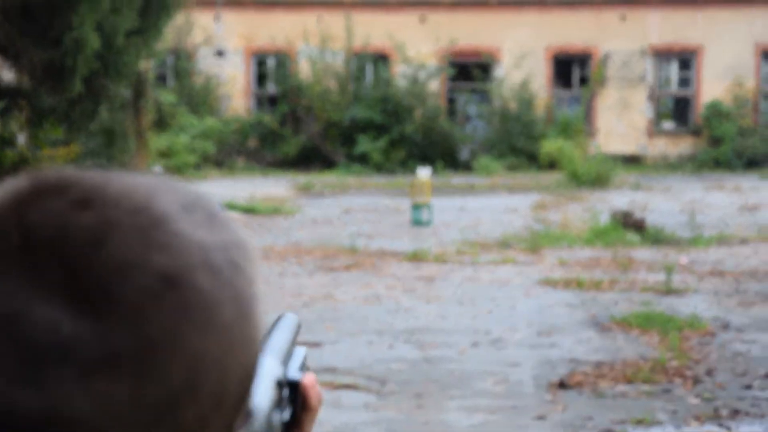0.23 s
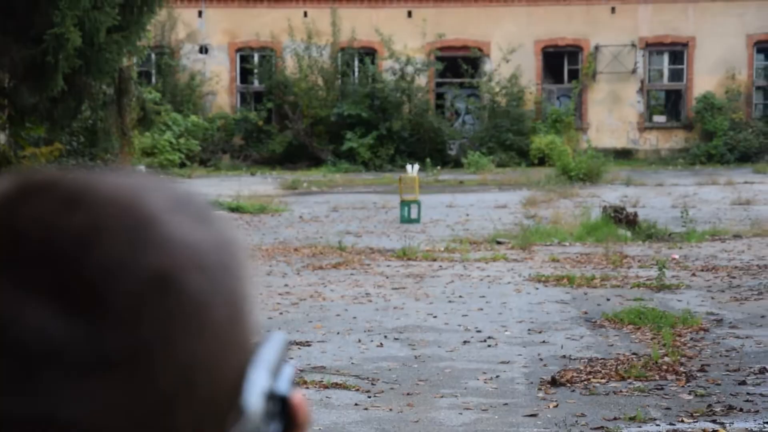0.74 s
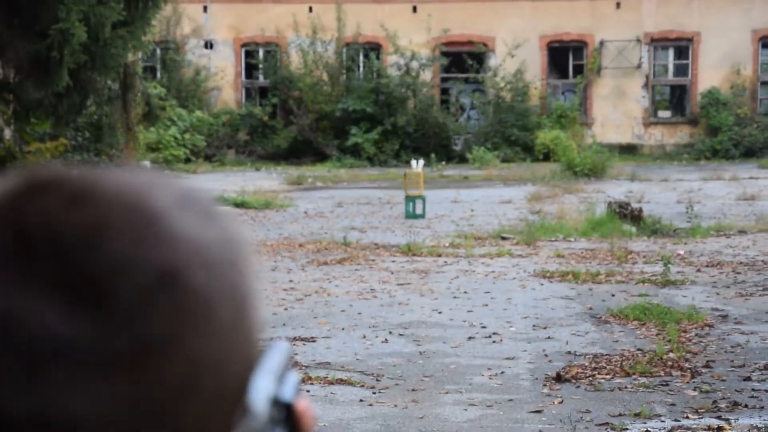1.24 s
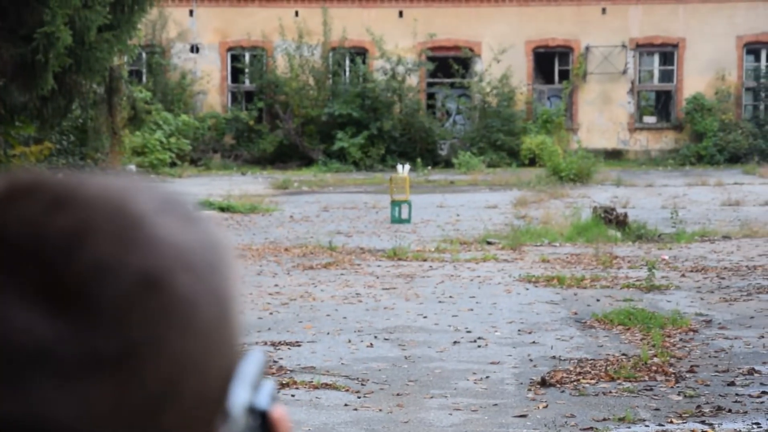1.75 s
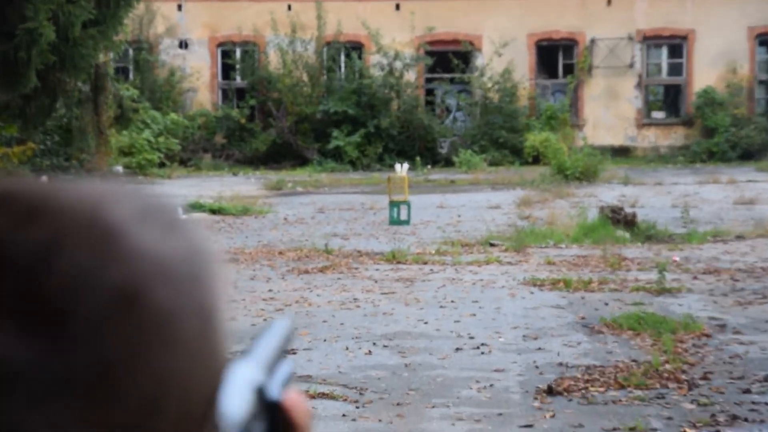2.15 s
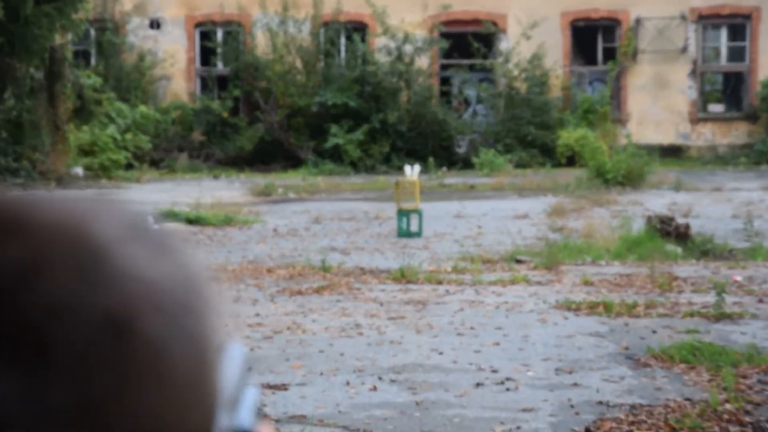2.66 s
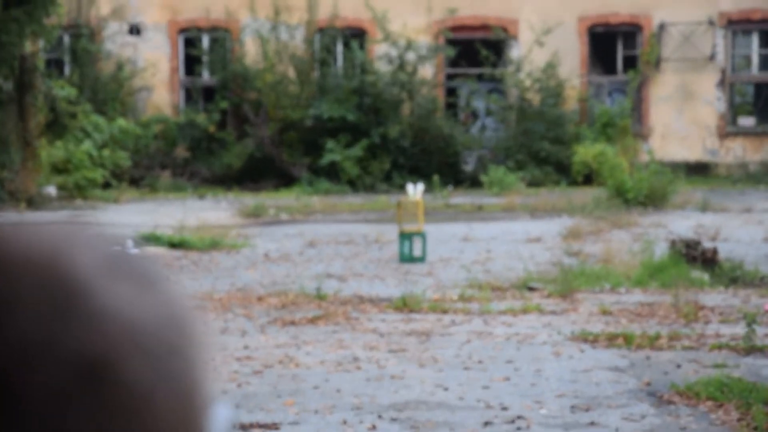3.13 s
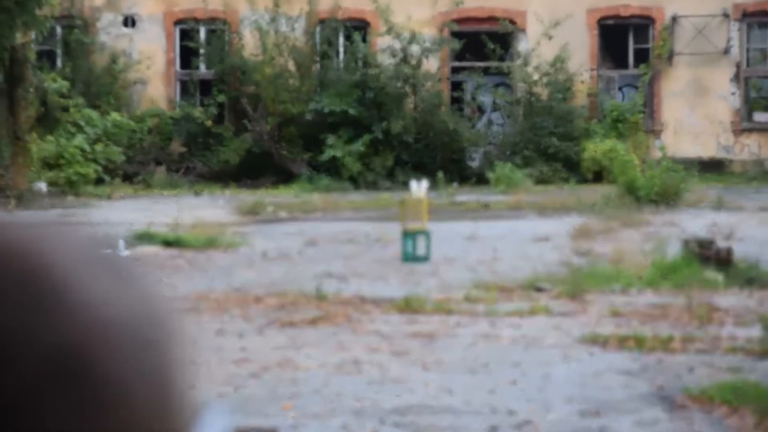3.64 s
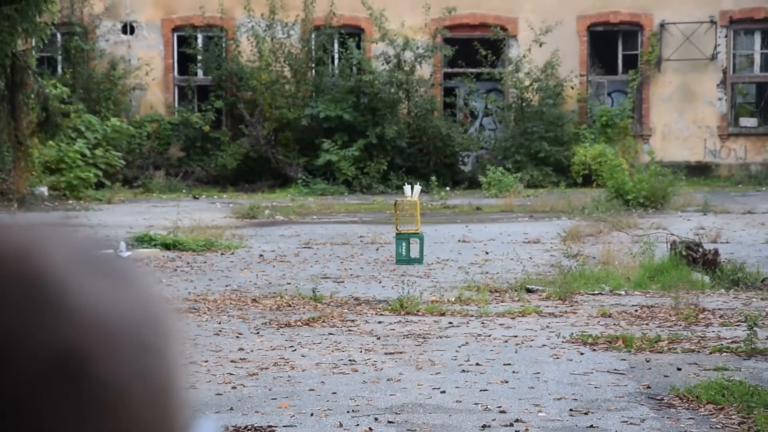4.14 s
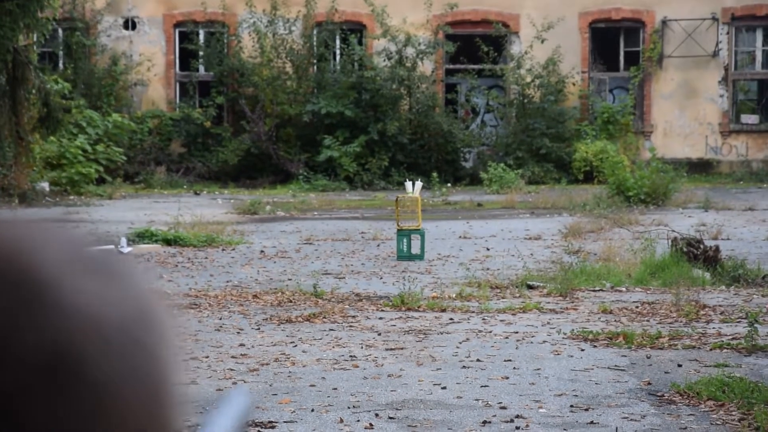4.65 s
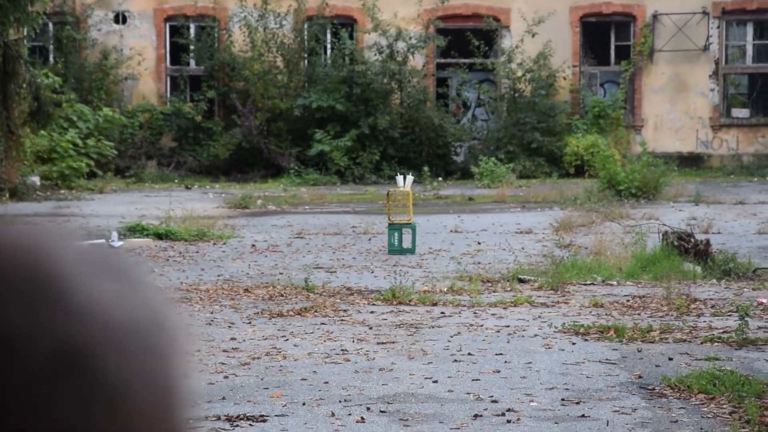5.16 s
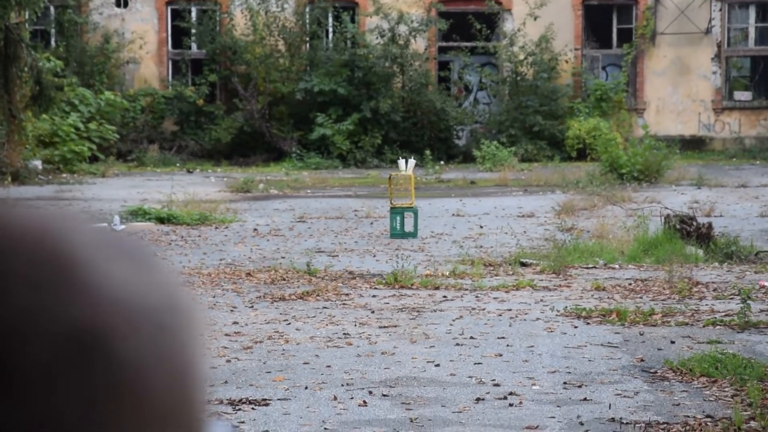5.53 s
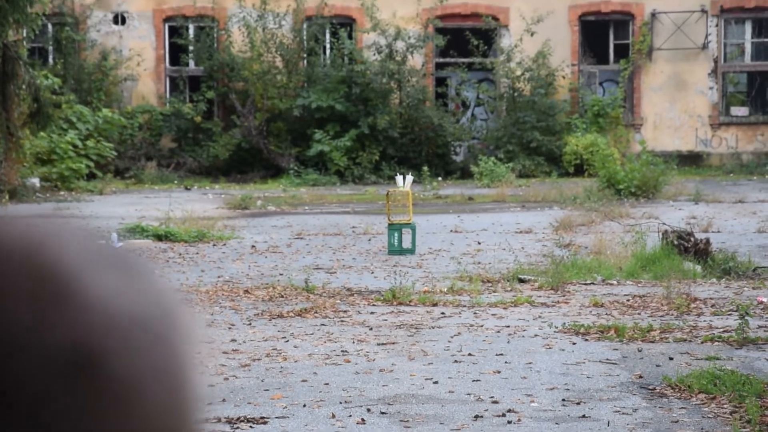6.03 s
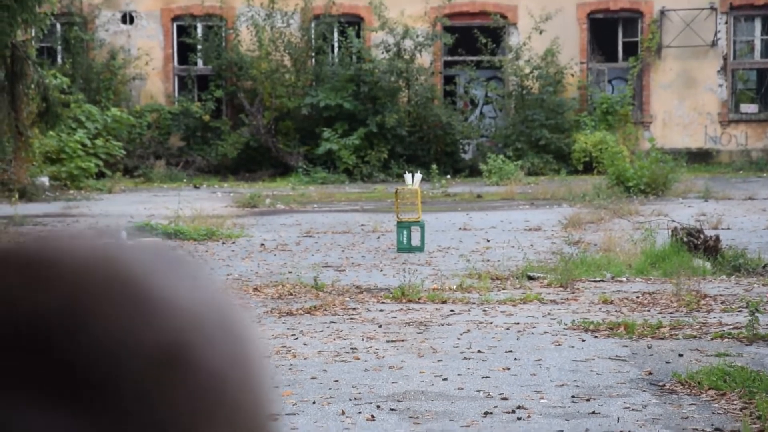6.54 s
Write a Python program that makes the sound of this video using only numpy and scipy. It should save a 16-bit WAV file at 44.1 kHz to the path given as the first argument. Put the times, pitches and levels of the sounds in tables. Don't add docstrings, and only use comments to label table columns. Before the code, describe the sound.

Spring-powered gun snaps three times close by, racked with plastic-metal clacks between shots, while a lens motor whirs and clacks over quiet outdoor air.

```python
import sys
import numpy as np
from scipy import signal
from scipy.io import wavfile
from scipy.ndimage import uniform_filter1d

SR = 44100
rng = np.random.default_rng(int(sys.argv[2]) if len(sys.argv) > 2 else 0)


def invert_db(level):
    return 10 ** (np.asarray(level, dtype=float) / 20)


def materialize(psi):
    bounded = np.clip(np.atleast_2d(psi).T, -1, 1)
    quanta = np.round(bounded * 32767).astype(np.int16)
    wavfile.write(sys.argv[1], SR, quanta)


N = 299248

# pitch_hz, density_db (per Hz)
AIR_SPECTRUM = [(20, -20), (40, -18.5), (70, -9.5), (170, -14.5), (350, -16.5), (700, -18.5), (1500, -24.5),
                (2600, -32), (4000, -28), (6500, -38.5), (8500, -43.5), (11000, -60), (16000, -43.5)]
# pitch_hz, width_hz, level_db
RUSH_MODES = [(863, 64, 3), (1017, 57, 8), (1555, 183, 4.5), (1708, 83, -2.5), (1440, 120, -2.5)]
# start_s, length_s, level_db
RUSH_PASSES = [(-0.2, 0.41, -50.5), (0.62, 0.568, -51.5), (1.1, 0.5, -59.5), (1.8, 1.18, -57),
               (3.45, 0.45, -51), (4.32, 1.5, -54), (5.8, 0.64, -60), (6.3, 0.43, -56.5)]
# start_s, length_s, level_db
DRONE_SPELLS = [(-0.2, 0.374, -52.5), (0.1, 0.41, -54.5), (0.64, 0.54, -53), (1.15, 0.99, -54),
                (3.58, 0.67, -58), (4.7, 1.368, -52.5), (6.0, 0.43, -56.5), (6.3, 0.44, -55)]
# pitch_hz, width_hz, level_db
LEAF_MODES = [(2380, 1550, 5), (4800, 3100, 1.5), (6660, 880, 5), (9700, 6200, -24.5)]
# start_s, length_s, level_db
LEAF_GUSTS = [
    (0.55, 1, -89),
    (2.95, 0.86, -82),
    (4.95, 0.26, -55),
    (5.9, 0.36, -56),
    (6.44, 0.3, -56.5),
]
# pitch_hz, width_hz, level_db (rms)
IDLE_BANDS = [(302, 35, -65), (3947, 150, -60.5), (3720, 210, -62), (4210, 150, -66), (5440, 740, -72),
              (6090, 900, -68.5)]
# pitch_hz, level_db (rms)
WHINE_TONES = [(199.6, -59.5), (15685, -82)]
# delay_s, level_db, dulled_above_hz, scattered_swell_db
WALL_ECHOES = [(0.100, -16.5, 3780, 8), (0.137, -27, 2700, -0.5), (0.206, -28, 3680, 3),
               (.297, -30.5, 5000, 4), (.44, -30, 2500, 6.5), (0.456, -33.5, 378, 3.5)]
# pitch_hz, level_db, t60_s
YARD_TAIL = [(148, -28, 0.72), (237.9, -37, 3), (399, -18.5, 0.34), (715, -24, 1.22), (1476, -22, 1.53),
             (2980, -19.5, 1.14), (6740, -17.5, 0.78), (9000, -14.5, 0.58), (13000, -28, 0.4)]
# delay_s, level_db
BOOM_MIRRORS = [(0.105, -26.5), (0.212, -38), (0.28, -27.5), (0.435, -26.5), (0.464, -30)]
# pitch_hz, width_hz, level_db
HOUSING_LOW_MODES = [(1670, 1400, -15), (2810, 460, -8.5), (3606, 310, 1.5), (4110, 310, 7),
                     (4266, 600, -1)]
# pitch_hz, width_hz, level_db
HOUSING_HIGH_MODES = [(5250, 150, 7), (6460, 580, 3), (7400, 630, 2), (9000, 1200, -9.5),
                      (12000, 9400, -21)]
# start_s, stop_s, kick_db, surge_db, cruise_db
MOTOR_RUNS = [
    (-0.035, 0.14, -60, -37, -42.5),
    (0.172, 0.347, -33, -31.5, -40.5),
    (0.408, 0.58, -27, -34, -42),
    (0.653, 0.701, -26, -36, -50),
    (3.33, 3.42, -27.5, -34, -45.5),
    (3.475, 3.653, -27, -35.5, -44),
]
# start_s, level_db (peak), high_db
LENS_CLACKS = [(0.0123, -19, -14), (0.0304, -18.5, -3.5), (0.2134, -24, 2), (0.314, -30, 6),
               (0.3426, -7.5, -10.5), (0.4534, -19.5, -3.5), (0.629, -31, -12), (0.6823, -15.5, -8),
               (2.0708, -9, -8.5), (3.3594, -20, -2), (3.5197, -18.5, -4), (3.6533, -15, -8)]
# start_s, second_touch_gap_ms, first_db, second_db
LENS_END_STOPS = [
    (0.1226, 7.2, -16.5, -12),
    (0.5827, 5.5, -14.5, -14),
    (3.4129, 7.2, -18, -13),
    (3.845, 8.5, -15, -12.5),
]
# pitch_hz, level_db, t60_s
CYLINDER_MODES = [(191, -15.5, 0.054), (243, -5.5, 0.042), (245.7, -25, 0.47), (360, -8.5, .06),
                  (501, -14, 0.027), (720, -23, 0.01), (731, -15, 0.053), (1440, -12.5, 0.03),
                  (1580, -8, 0.015)]
# pitch_hz, width_hz, level_db
SHELL_LOW_MODES = [(228, 60, -2.5), (323, 71, -3), (479, 143, -3), (689, 58, -1)]
# pitch_hz, width_hz, level_db
GRIP_LOW_MODES = [(207, 195, -12.5), (363, 88, -6.5), (602, 106, -8), (808, 134, -5)]
# pitch_hz, width_hz, level_db
GUN_MID_MODES = [(843, 715, -5), (1315, 620, 1), (1561, 317, 1), (2191, 450, -0.5), (2334, 1040, -3),
                 (2800, 1100, -17)]
# pitch_hz, width_hz, level_db
GUN_HIGH_MODES = [(3060, 600, -4), (4190, 890, -1), (4990, 1500, -2), (6710, 1100, 0.5), (7570, 900, -2.5),
                  (8110, 650, -2), (8500, 2100, -12.5), (12700, 4900, -27.5)]
# sear_release_s, slam_s, crack_db, thump_db, high_db
GUN_SHOTS = [
    (1.3354, 1.352, 0.5, -1, -1),
    (3.7, 3.714, -2, -3, -8),
    (5.406, 5.4151, 3, -7.5, 0.5),
]
# travel_share, level_db (peak), low_db, high_db, fade_ms
PISTON_TRAVEL = [
    (0, -18, 3.5, -8.5, 8),
    (0.45, -17, 3.5, -6, 13),
    (0.7, -19, -4.5, -12, 2),
]
# delay_ms, level_db (peak), low_db, high_db, fade_ms
PISTON_REBOUND = [
    (0, 8, -1.5, -9.5, 3.8),
    (2, -3.5, -14, -7.5, 2.47),
    (6, -7, -4, 0, 4.1),
    (14, -28.5, 12.5, -7.5, 9.7),
]
# start_s, level_db (peak), low_db, high_db
PUMP_PULL = [(2.0705, -20, 1.5, -21), (2.095, -28, -5, -18), (2.1092, -29, -16, -16),
             (2.1259, -19, -18, -3), (2.139, -10, -10.5, -1.5), (2.1624, -27.5, 5, 12),
             (2.1668, -14.5, 0.5, -10), (2.188, -3, -17.5, -7.5), (4.5016, -22, -8.5, -22.5),
             (4.566, -12, -6.5, -6), (4.577, -10, -16, -8), (4.5846, -25, -17, 5),
             (4.6071, -8.5, -6, -15.5), (4.6313, -4.5, -11.5, -6)]
# start_s, level_db (peak), low_db, high_db
PUMP_PUSH = [(2.4314, -19, -15, -7), (2.454, -21, -6, -2), (2.4809, -11, -30, -10.5),
             (2.5083, -11, -8, -11), (2.5134, -5.5, -9.5, -12.5), (2.518, -10.5, -29.5, -4.5),
             (4.9056, -25.5, -0.5, -0.5), (4.9375, -15, -10, -7.5), (4.9534, -29.5, 2, -26.5),
             (4.9687, -21, 5.5, 6), (4.9789, -4, -4, -5.5)]
# start_s, level_db (peak), low_db, high_db
HAND_SHIFTS = [(2.0143, -28.5, -7, -19), (2.3459, -23, -3, -11), (2.3955, -34, -17, -8),
               (2.8953, -27, -2, -16), (4.4324, -36, -2, -4), (4.8852, -30.5, -6, -6),
               (5.9526, -29.5, 2.5, -12), (5.9746, -45, -4, 2), (5.7125, -41, -8, 2), (6.7628, -44, 3, 1)]
# delay_s, then relative to the contact level_db, low_db, high_db
LOOSE_JINGLE = (0.0065, -21.5, 5.5, 10)
# start_s, stop_hit_s, level_db (at the stop)
SLIDE_STROKES = [
    (2.1, 2.189, -27.5),
    (2.425, 2.535, -32),
    (4.527, 4.633, -28.5),
    (4.884, 4.983, -36),
]


def rms_one(x):
    return x / np.sqrt(np.mean(x ** 2) + 1e-20)


def cut(x, hz, kind, order=2):
    return signal.sosfilt(signal.butter(order, hz, kind, fs=SR, output="sos"), x)


def resonate(x, hz, width_hz):
    r = np.exp(-np.pi * width_hz / SR)
    feedback = [1, -2 * r * np.cos(2 * np.pi * hz / SR), r * r]
    return signal.lfilter(np.array([1, 0, -1]) * (1 - r * r) / 2, feedback, x + 1e-18)


def body(x, modes):
    def through(v):
        return sum((-1) ** k * invert_db(db) * resonate(v, hz, width) for k, (hz, width, db) in enumerate(modes))
    click = np.eye(1, 8192)[0]
    return through(x) / np.sqrt(np.sum(through(click) ** 2))


def bursts(times, levels_db, fades_ms, rise_ms, snap_db):
    env = np.zeros(N + SR)
    t_ms = np.arange(SR // 10) / SR * 1000
    for s, db, fade_ms in zip(times, levels_db, fades_ms):
        i = round(s * SR)
        rattle = np.exp(-t_ms / max(fade_ms, 0.3))
        snap = invert_db(snap_db) * np.exp(-t_ms / 0.19)
        env[i:i + len(t_ms)] += invert_db(db) * (1 - np.exp(-t_ms / rise_ms)) * (rattle + snap)
    return env[:N] * rng.standard_normal(N)


def drift(rate_hz):
    r = np.exp(-2 * np.pi * rate_hz / SR)
    wander = signal.lfilter([1], [1, -2 * r, r * r], rng.standard_normal(N + SR))
    return rms_one(wander[SR:])


def swells(rows, edge_s, still_db):
    t = np.arange(N) / SR
    gain = invert_db(still_db)
    for s, length, db in rows:
        inside = np.clip(np.minimum(t - s, s + length - t) / edge_s, 0, 1)
        gain = gain + invert_db(db) * np.sin(np.pi / 2 * inside) ** 2
    return gain


def octave_bands(shape, size):
    edges = 22 * 2 ** np.arange(0, 10, 0.5)
    white = rng.standard_normal((2, size))
    out = 0
    for k, (lo, hi) in enumerate(zip(edges, edges[1:])):
        band = signal.butter(2, [lo, hi], "band", fs=SR, output="sos")
        out = out + shape(np.sqrt(lo * hi)) * signal.sosfilt(band, white[k % 2])
    return out


def narrow_noise(hz, width_hz):
    return rms_one(resonate(resonate(rng.standard_normal(N), hz, width_hz), hz, width_hz))


def outdoor_air():
    hz, db = np.transpose(AIR_SPECTRUM)
    air = rms_one(octave_bands(lambda f: invert_db(np.interp(np.log(f), np.log(hz), db)), N))
    return air * invert_db(-52.5 + 0.6 * drift(1.1))


def far_rush():
    rush = body(rng.standard_normal(N), RUSH_MODES)
    return rush * swells(RUSH_PASSES, edge_s=0.082, still_db=-69) * invert_db(0.77 * drift(12))


def far_drone():
    drone = narrow_noise(hz=553.5, width_hz=30.3)
    return drone * swells(DRONE_SPELLS, edge_s=0.056, still_db=-79.5) * invert_db(1.3 * drift(10))


def leaves():
    return body(rng.standard_normal(N), LEAF_MODES) * swells(LEAF_GUSTS, edge_s=0.092, still_db=-73)


def camera_idle():
    out = np.zeros(N)
    for hz, width_hz, db in IDLE_BANDS:
        out += invert_db(db + 2.5 * drift(40)) * narrow_noise(hz, width_hz)
    for hz, db in WHINE_TONES:
        tone = np.sqrt(2) * np.sin(2 * np.pi * hz * np.arange(N) / SR)
        out += invert_db(db + 0.66 * drift(5.4)) * tone
    return out


def background():
    return outdoor_air() + far_rush() + far_drone() + leaves() + camera_idle()


def scatter_db(t):
    level = np.full(len(t), -6.0)
    near_ground = (0.0053, 11.5)   # delay_s, swell_db
    for delay, swell_db in [near_ground] + [(wall[0], wall[3]) for wall in WALL_ECHOES]:
        late = np.maximum(t - delay, 0)
        level += swell_db * (1 - np.exp(-late / 0.009)) * np.exp(-late / 0.051)
    return level


def yard(views):
    t = np.arange(2 * SR) / SR
    hz, db, t60 = np.transpose(YARD_TAIL)

    def at(f, column):
        return np.interp(np.log(f), np.log(hz), column)
    tail = 0.06 * octave_bands(lambda f: invert_db(at(f, db) - 60 * t / at(f, t60)), len(t))
    tail *= invert_db(scatter_db(t))
    for delay, echo_db, dull_hz, _ in WALL_ECHOES:
        rough = (t > delay) * np.exp(-np.maximum(t - delay, 0) / 0.0027)
        tail += invert_db(echo_db - 24.5) * cut(rng.standard_normal(len(t)) * rough, dull_hz, "low")
    turn = np.arange(2 * SR) // 256 % len(views)
    shares = 1.0 * (turn == np.arange(len(views))[:, None])
    shares = uniform_filter1d(shares, size=128)
    return sum(signal.fftconvolve(x, tail * np.sqrt(np.abs(share)))[:N] for x, share in zip(views, shares))


def boom(thump):
    low = resonate(resonate(thump, 248.4, 62), 248.4, 62)
    return sum(invert_db(db) * np.append(np.zeros(round(s * SR)), low)[:N] for s, db in BOOM_MIRRORS)


def motor_effort():
    out = np.zeros(N)
    for s, stop, _, surge_db, cruise_db in MOTOR_RUNS:
        t = np.arange(N) / SR - s
        surge = np.exp(-((t - 0.019) / 0.0089) ** 2)
        catch = invert_db(1) * np.exp(-((t - 0.061) / 0.013) ** 2)
        cruise = (t > 0.033) * invert_db(-8 * np.clip(t, 0, 1))
        out += (t < stop - s) * (invert_db(surge_db) * surge + invert_db(cruise_db) * (cruise + catch))
    return uniform_filter1d(out, size=200)


def lens_knocks():
    rows = list(LENS_CLACKS)
    rows += [(s, kick_db, -3.5) for s, _, kick_db, *_ in MOTOR_RUNS if s > 0]
    for s, gap_ms, first_db, second_db in LENS_END_STOPS:
        touches = s + np.cumsum([0, gap_ms, 4]) / 1000
        rows += zip(touches, [first_db, second_db, second_db - 7], (-7, -21, -3.5))
    return np.transpose(rows)


def focus_motor():
    s, db, high_db = lens_knocks()
    fade_ms = 1.17 + 0.1852 * np.clip(db + 26, 0, 30)
    step_hz = 333.5
    turns = np.arange(N + 1) * step_hz / SR + 0.012 * np.append(drift(81), 0)
    steps = np.diff(np.floor(turns)) ** 2 * invert_db(3 * drift(60))
    whir = motor_effort() * (cut(rms_one(steps), 4000, "low") + 0.5 * rng.standard_normal(N))
    knock = np.zeros((2, N))
    knock[:, np.round(s * SR).astype(int) + 8] = invert_db([db + 9, db + high_db - 7])
    low_rattle = bursts(s, db - 9.5, fade_ms, rise_ms=0.14, snap_db=-12)
    high_rattle = bursts(s, db + high_db - 9, fade_ms, rise_ms=0.11, snap_db=15)
    low = body(whir + knock[0] + low_rattle, HOUSING_LOW_MODES)
    return low + body(invert_db(-6.5) * whir + knock[1] + high_rattle, HOUSING_HIGH_MODES)


def piston():
    blows, out = np.zeros(N), np.zeros(N)
    lag_ms, bounce_ms, bounce_db = 0.97, 3.806, 0.5
    for _, slam, _, thump_db, _ in GUN_SHOTS:
        blows[round((slam + lag_ms / 1000) * SR)] = invert_db(thump_db)
        blows[round((slam + (lag_ms + bounce_ms) / 1000) * SR)] = invert_db(thump_db + bounce_db)
    for hz, db, t60 in CYLINDER_MODES:
        r, w = invert_db(-60 / (t60 * SR)), 2 * np.pi * hz / SR
        out += signal.lfilter([0, invert_db(db) * np.sin(w)], [1, -2 * r * np.cos(w), r * r], blows + 1e-18)
    return out


def contacts(table, low_modes, friction, snap_db):
    s, db, low_db, high_db, fade_ms = np.transpose(table)
    grit = friction * rng.standard_normal((3, N))
    low = bursts(s, db + low_db - 5, fade_ms, 0.54, snap_db) + invert_db(-9.5) * grit[0]
    mid = bursts(s, db - 8, fade_ms, 0.3, snap_db) + invert_db(-5.5) * grit[1]
    high = bursts(s, db + high_db - 6, 1.245 * fade_ms, 0.21, snap_db) + invert_db(-9.5) * grit[2]
    return body(low, low_modes) + body(mid, GUN_MID_MODES) + body(high, GUN_HIGH_MODES)


def slide_rubbing():
    t = np.arange(N) / SR
    out = np.zeros(N)
    for s, stop, db in SLIDE_STROKES:
        rise_db = -13 * np.clip((stop - t) / (stop - s), 0, 1)
        release_db = -600.5 * np.maximum(t - stop, 0)
        out += invert_db(db + rise_db + release_db) * np.clip((t - s) / 0.011 + 1, 0, 1)
    return out


def shots():
    rows = []
    overdrive_db = 1
    for sear, slam, crack_db, _, shot_high_db in GUN_SHOTS:
        for share, db, low, high, fade_ms in PISTON_TRAVEL:
            rows.append((sear + share * (slam - sear), db, low, high, fade_ms))
        for ms, db, low, high, fade_ms in PISTON_REBOUND:
            rows.append((slam + ms / 1000, db + crack_db + overdrive_db, low, high + shot_high_db, fade_ms))
    return contacts(rows, SHELL_LOW_MODES, friction=0, snap_db=-6)


def racking():
    rows = []
    for table, fade_ms in ((PUMP_PULL, 2.67), (PUMP_PUSH, 3.73), (HAND_SHIFTS, 2.86)):
        rows += [(*row, fade_ms) for row in table]
    lag, jingle_db, jingle_low, jingle_high = LOOSE_JINGLE
    rows += [(s + lag, db + jingle_db, low + jingle_low, high + jingle_high, fade_ms)
             for s, db, low, high, fade_ms in rows]
    friction = invert_db(4.2 * drift(150)) * slide_rubbing()
    return contacts(rows, GRIP_LOW_MODES, friction, snap_db=6)


def scene():
    thump = piston()
    views = [cut(shots() + racking() + thump, 139, "high") for side in range(3)]
    loud = views[0] + yard(views) + boom(thump) + focus_motor()
    return (cut(loud, 8700, "low") + background())[None]


def band_limit(x):
    return signal.sosfilt(signal.butter(12, 16660, fs=SR, output="sos"), x)


def record(dry):
    x = dry / (1 + np.abs(dry / 0.93) ** 8) ** (1 / 8)
    x = cut(x, 30, "high")
    x = cut(x, 22000, "low", order=8)
    return band_limit(x)


dry = scene()
out = record(dry)
materialize(out)
```